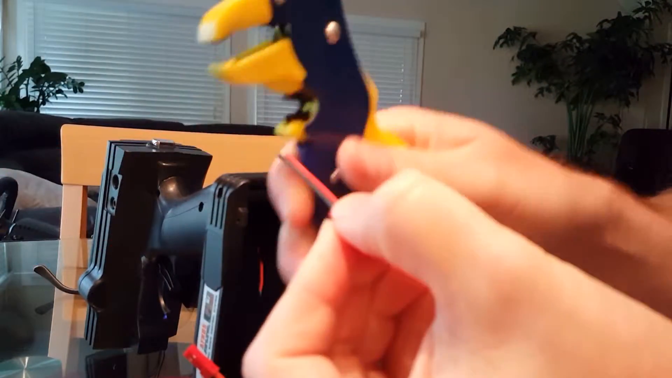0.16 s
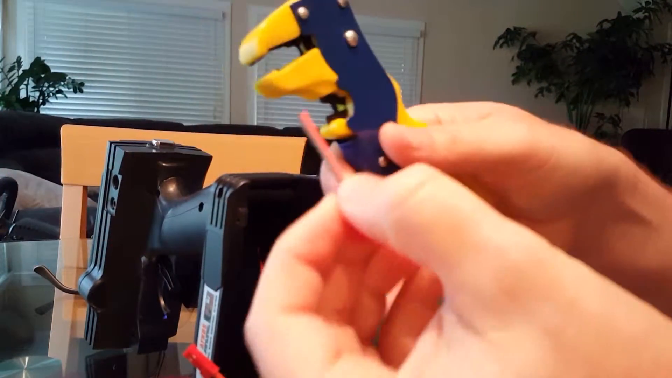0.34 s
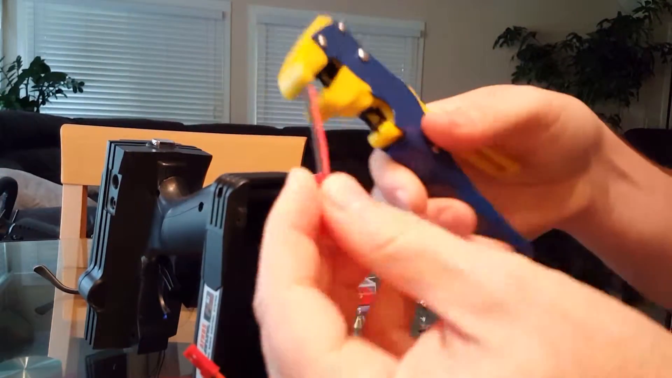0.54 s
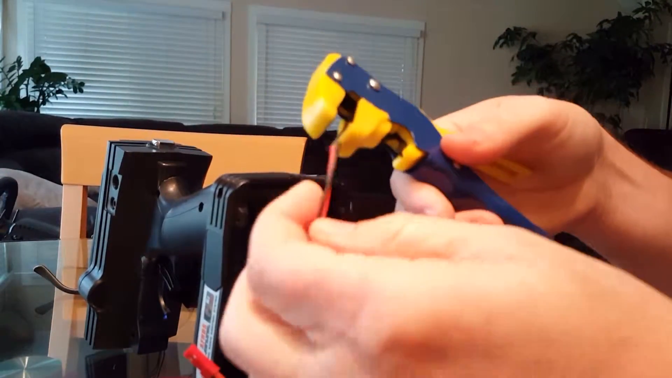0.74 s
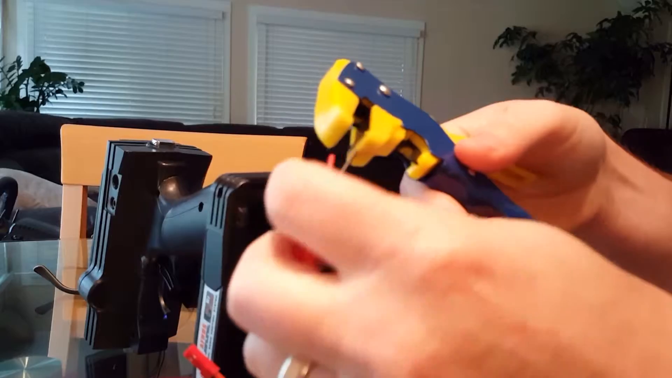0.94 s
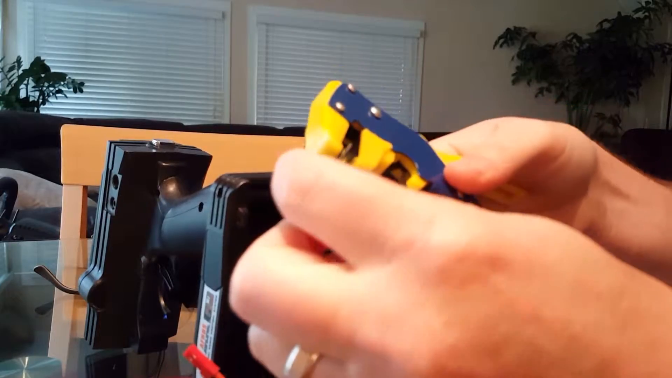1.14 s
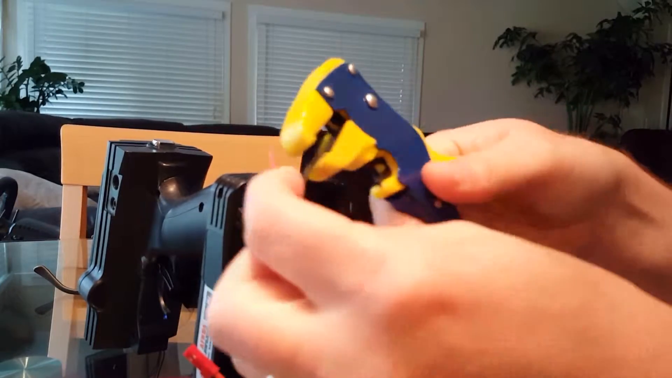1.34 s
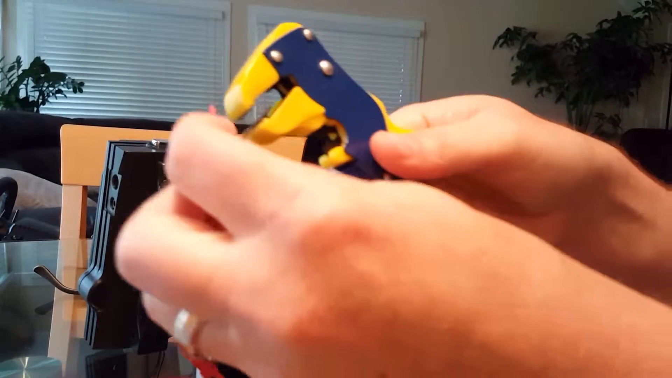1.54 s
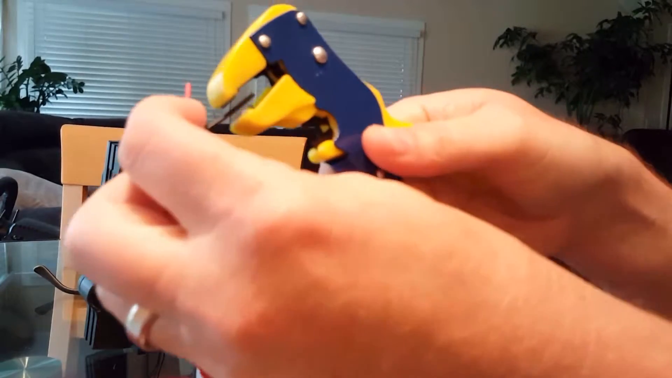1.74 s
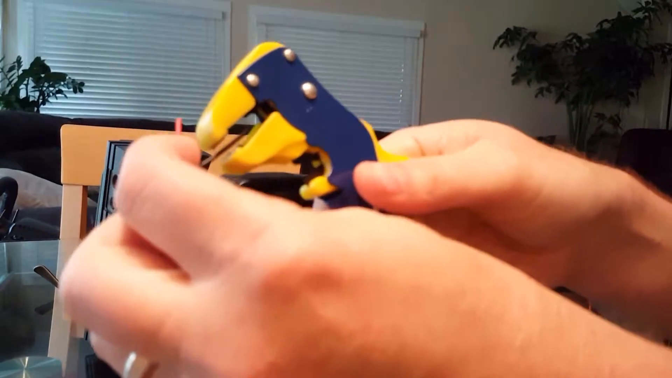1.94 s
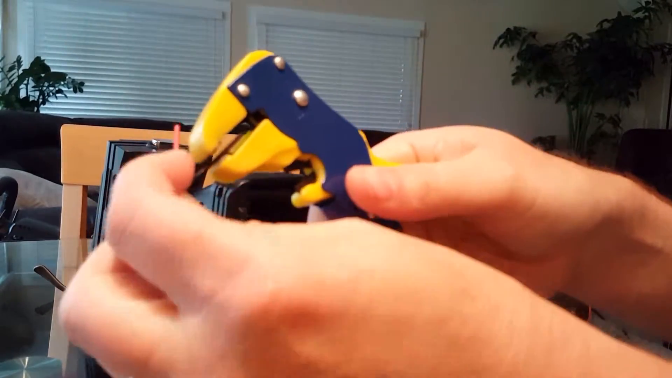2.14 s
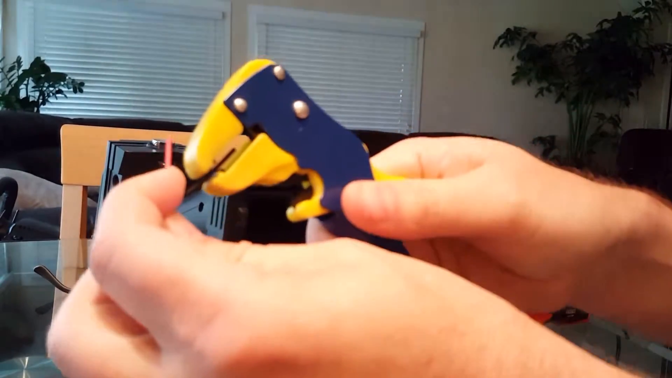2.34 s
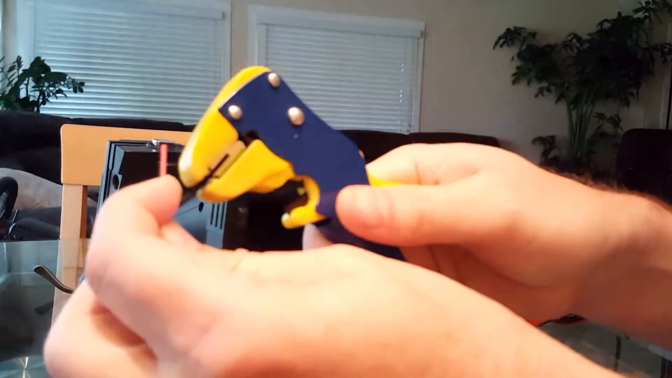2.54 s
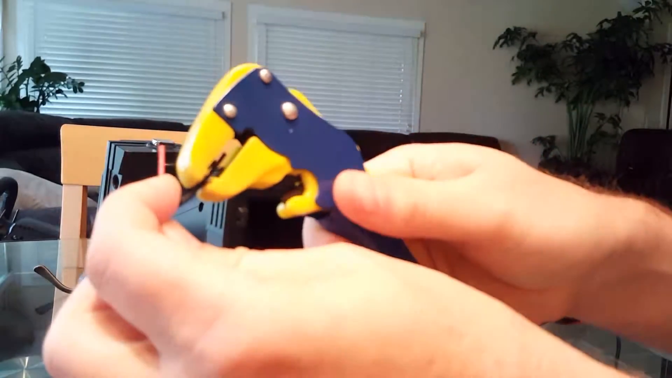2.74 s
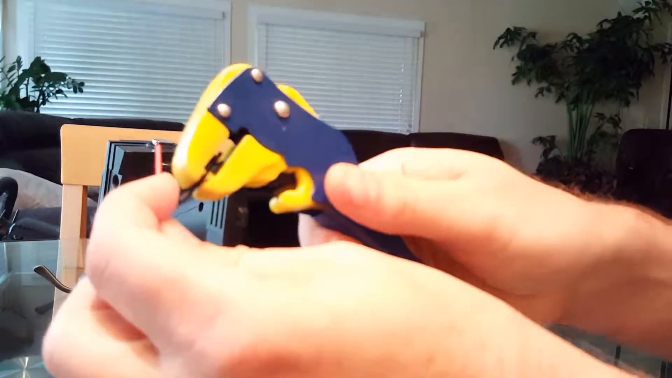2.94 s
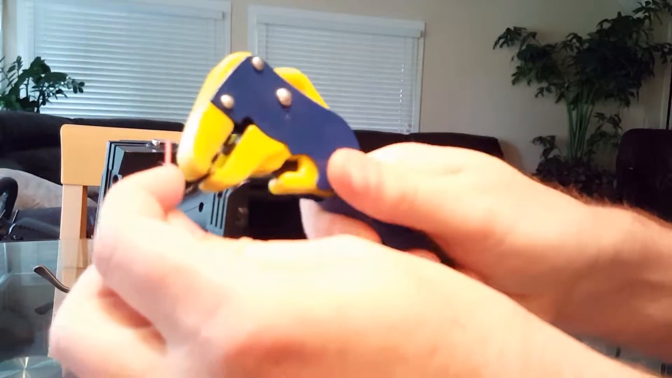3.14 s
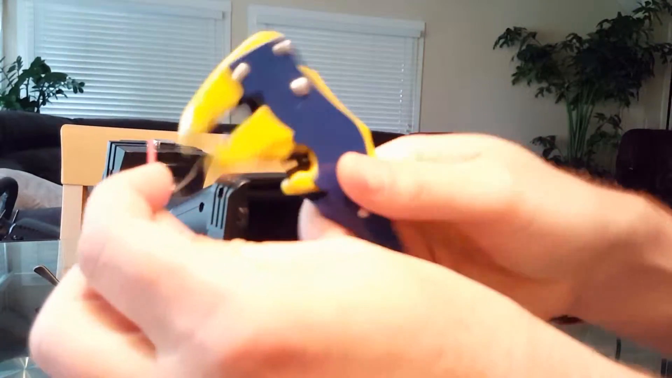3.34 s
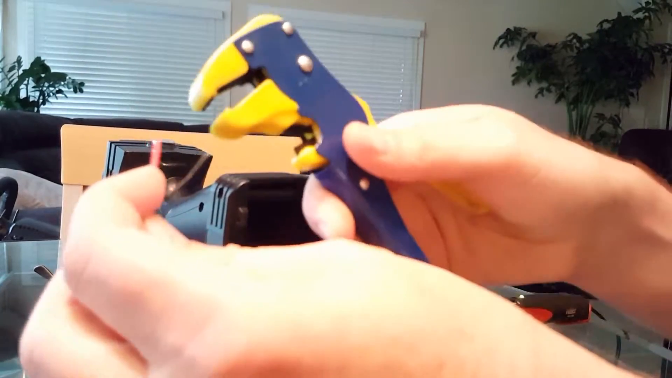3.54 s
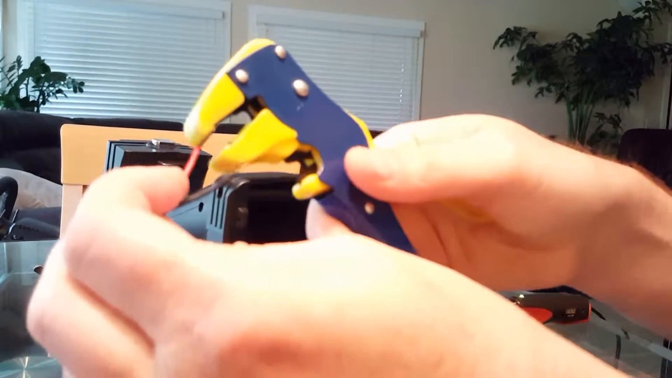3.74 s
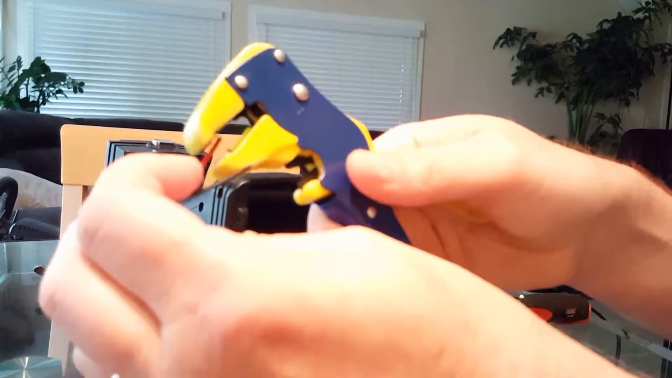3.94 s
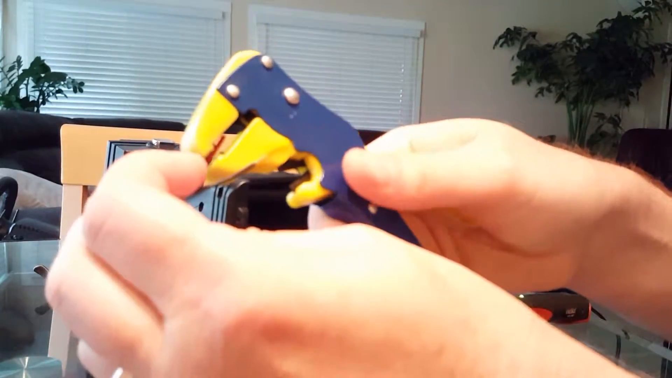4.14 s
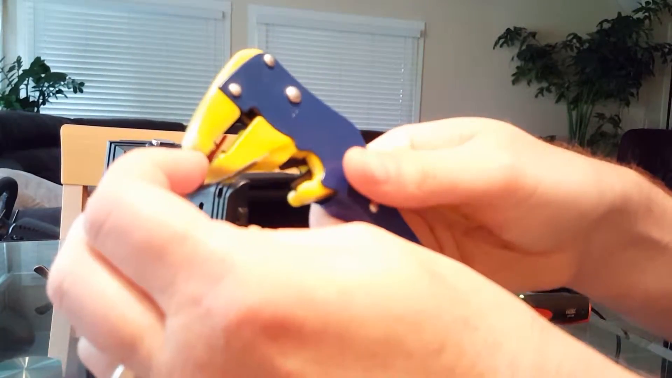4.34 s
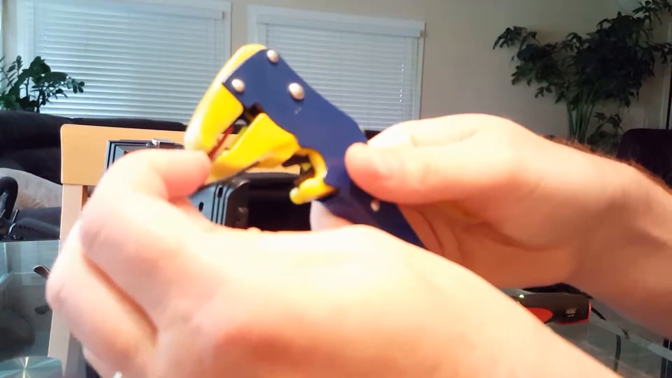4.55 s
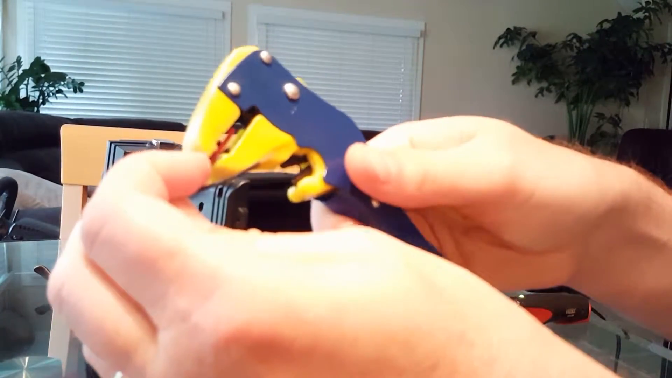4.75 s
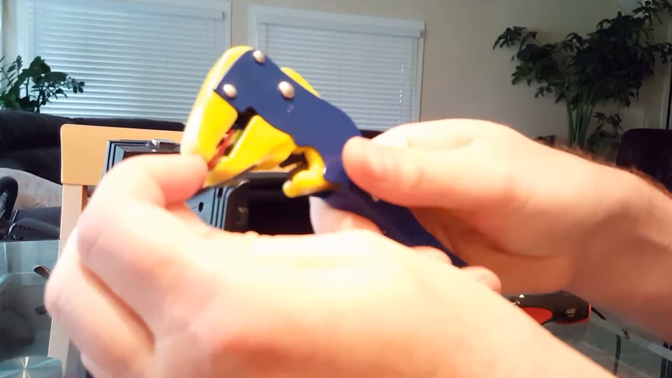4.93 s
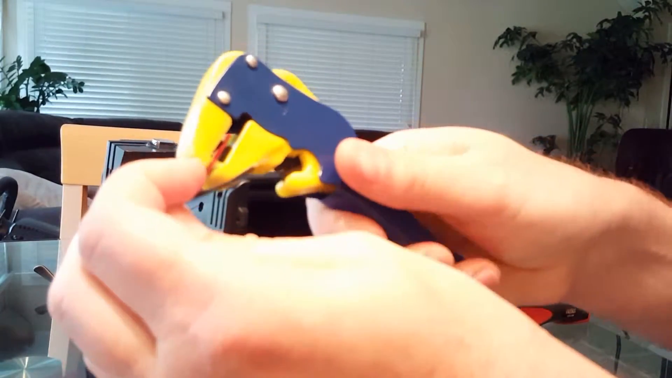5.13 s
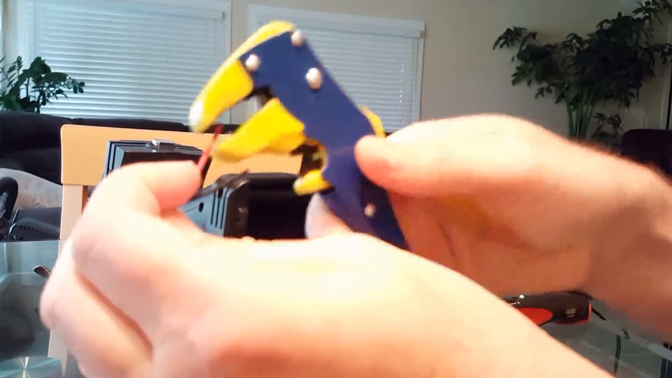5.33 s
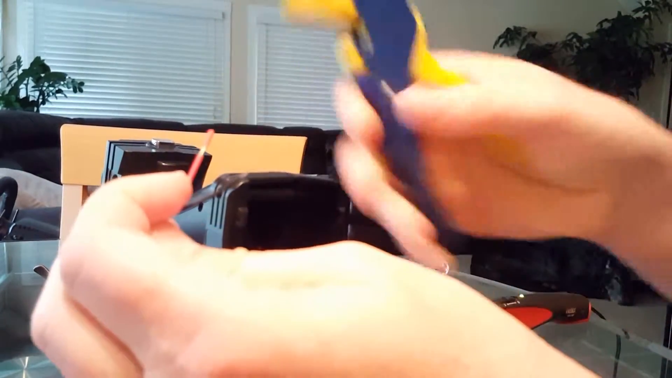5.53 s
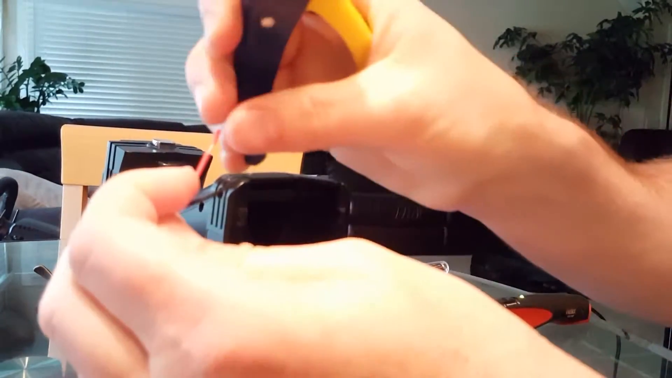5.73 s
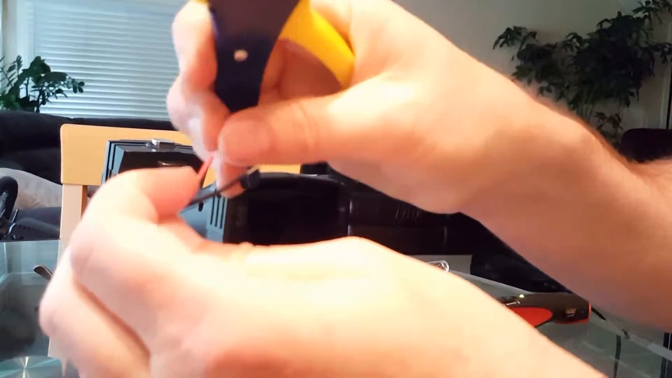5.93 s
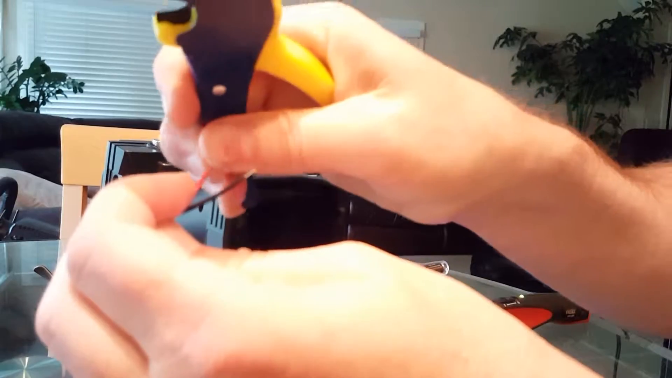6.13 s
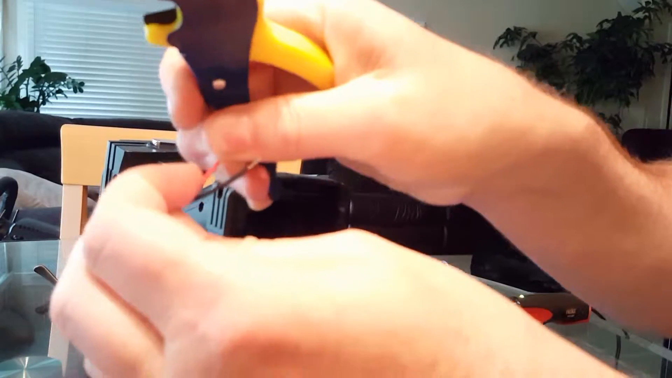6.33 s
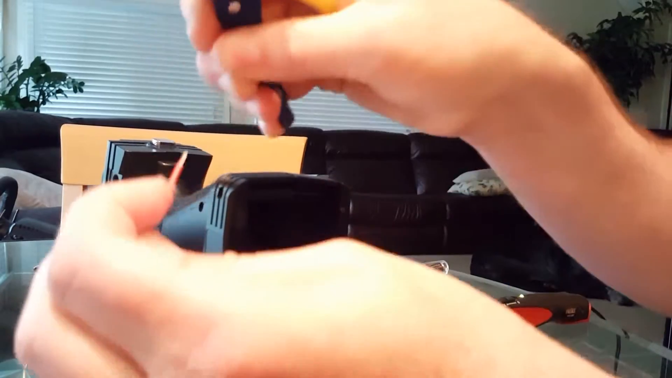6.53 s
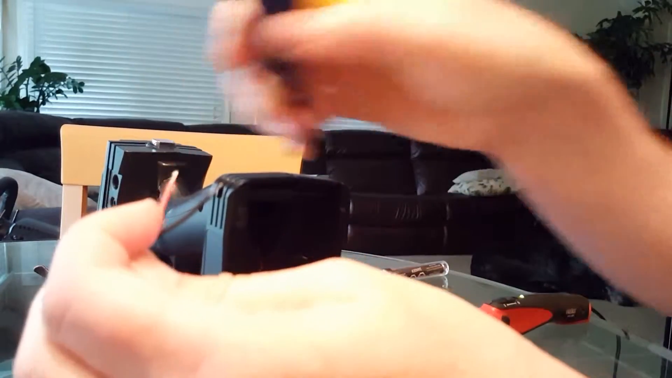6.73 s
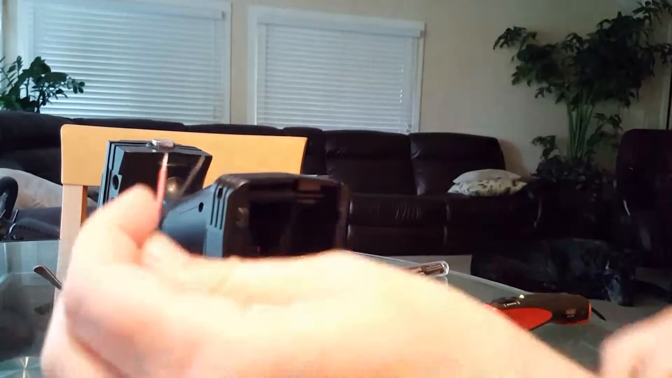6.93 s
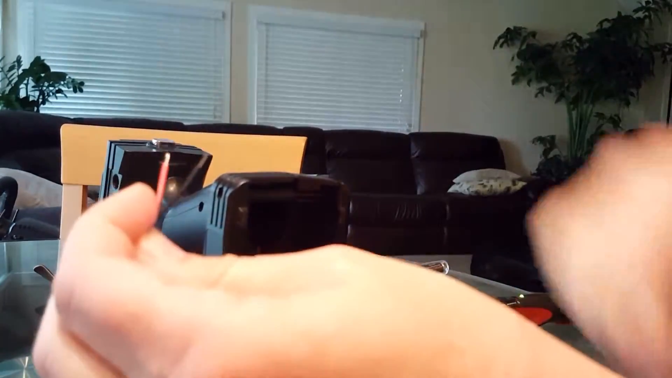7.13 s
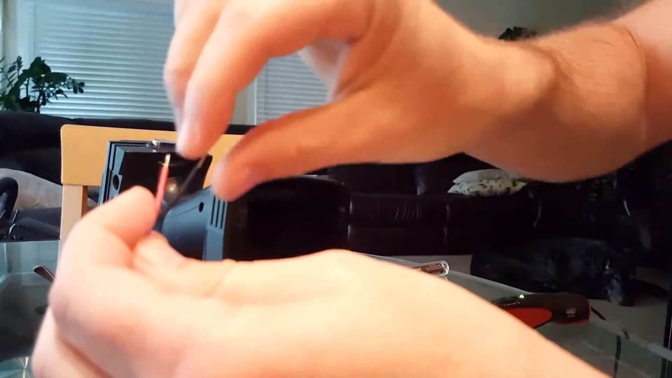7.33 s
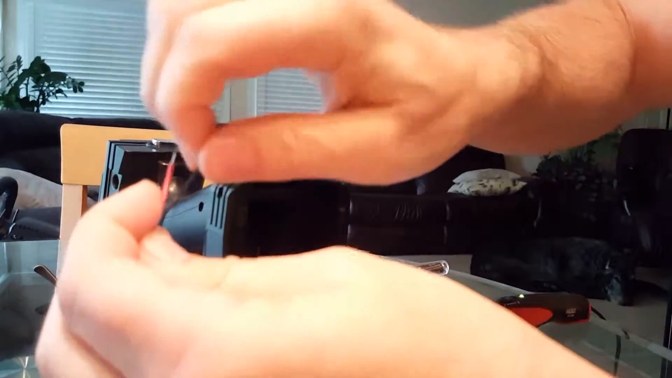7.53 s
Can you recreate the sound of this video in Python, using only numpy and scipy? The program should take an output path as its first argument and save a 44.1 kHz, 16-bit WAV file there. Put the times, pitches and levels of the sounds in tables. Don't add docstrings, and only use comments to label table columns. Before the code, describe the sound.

Wire stripper jaws spring open, snap shut and release twice with sharp metallic cracks, then the tool clatters onto a glass table and rocks still.

```python
import sys
import numpy as np
from scipy import signal
from scipy.fft import rfft, irfft
from scipy.io import wavfile
from scipy.ndimage import uniform_filter1d

SR = 44100
rng = np.random.default_rng(int(sys.argv[2]) if len(sys.argv) > 2 else 0)


def waveform_to_disk(signal):
    frames = np.transpose(np.atleast_2d(signal))
    scaled = np.clip(frames, -1, 1) * 32767
    samples = np.round(scaled).astype(np.int16)
    wavfile.write(sys.argv[1], SR, samples)


def ratio_of_db(decibels):
    return 10 ** (np.asarray(decibels, float) / 20)


N = 334278

# (frequency [Hz], level per Hz [dB])
AIR_SPECTRUM = [(12, -34.5), (20, -8.5), (27, -19), (79, -11), (96, -11.5), (224, -6.5), (265, -4),
                (428, -11.5), (521, -7.5), (566, -10), (888, -13.5), (1740, -21), (4160, -27),
                (14300, -36.5), (16500, -45)]
# (frequency [Hz], width [Hz], level [dB])
DUCT_PEAKS = [(271, 23, 5), (394, 69, 4.5), (504, 25, 5)]
# (time [s], level [units of 3 dB], half width [s])
AIR_SWELLS = [(.25, 0.5, .13), (5.9, 0.5, .3), (7.2, 1, .15), (7.5, 0.55, .2)]
# (frequency [Hz], correlation [-1 to 1])
MIC_LIKENESS = [(60, 0.00091), (150, 0.88), (380, 0.9), (950, 0.46), (2380, -0.19), (5980, 0.061),
                (15000, -0.38)]
# (frequency [Hz], level [dB])
MOTOR = (107, -77)

# (start [s], length [s], level [dB], level change over the stroke [dB])
RUB_STROKES = [(0.034, 0.16, -80.5, 18.5), (0.276, 0.14, -61, -22), (0.408, 0.12, -83, -8),
               (0.516, 0.076, -85.5, -5), (1.419, 0.18, -81.5, -18), (6.732, 0.19, -89, 2.5)]
# (frequency [Hz], level per Hz [dB])
RUB_COLOUR = [(300, -27.5), (1000, -7.5), (1500, -9.5), (1760, -8.5), (4800, -4), (5420, -17), (15100, -16),
              (16500, -41)]

# (time [s], peak level [dB], left-right difference [dB], contact length [ms], ring level [dB])
GRIP_HITS = [
    (.042, -63, 0.5, 1.4, -13.5),
    (.049, -49, 13.5, 1.3, -25),
    (.0593, -26, -1.5, 2.2, -21),
    (.097, -46, 1.5, 2, -3.5),
    (.108, -51, -22.5, 2.3, -16),
    (.1258, -17.5, -0.5, 1.77, -14.5),
    (.193, -34, -5.5, 1.2, -17.5),
]
RELEASE_HITS = [
    (.2192, -12.5, -2.3, 0.84, -26),
    (3.4290, -11, -0.5, 0.66, -30),
    (5.4028, -9.5, -1.1, 0.45, -30.5),
]
SETTLING_HITS = [(.240, -43, -4, 1.5, -22), (.291, -47, 3, 1.3, -14), (.3192, -34, -2, 0.5, -14),
                 (.345, -52, 3, 1.2, -12), (.3805, -42, -1.2, 0.6, -16), (.404, -53, -3, 1.5, -12)]
TAP_HITS = [
    (1.4692, -62, 2, 2, -30),
    (6.4955, -50.5, 1, 1.58, -30),
    (.412, -61, 0, 2, -31),
]
LATCH_HITS = [
    (3.4097, -33.5, -3, 0.65, -32.5),
    (3.412, -45, -6.5, 0.87, -28.5),
    (5.388, -45, -18.5, .7, -41.5),
    (5.3895, -35, 5, 1, -35.5),
]
CLAMP_HITS = [
    (3.1734, -11.5, -3, 0.8, -19),
    (5.2712, -8.5, -3.5, 0.64, -23.5),
]
REBOUND_HITS = [
    (3.1803, -30, -2, 1, -6),
    (5.2782, -26, -3, 1, -5),
]
FIRST_BOUNCE_HITS = [
    (6.9950, -9, 0, 1.56, -14.5),
    (6.9995, -20.5, -13, 0.85, -27),
    (7.0042, -14.5, -1.5, 2.5, -26.5),
    (7.011, -30, -9.5, 2.5, -19),
    (7.0245, -31.5, -2.5, 6.5, -3.5),
]
SECOND_BOUNCE_HITS = [(7.1578, -19, 0.5, 6.4, -27.5), (7.1633, -10, -2.5, 3.7, -9.5),
                      (7.167, -9, -3.5, 3, -29), (7.172, -17, -3, 1.6, -23), (7.1765, -15, 4, 2.7, -28),
                      (7.180, -14, -3, 1.4, -21.5), (7.1885, -22, -8, 1.5, -28),
                      (7.199, -19.5, 4, 0.87, -21)]
# (time [s], peak level [dB], left-right difference [dB], steel ring level [dB])
TICK_HITS = [(1.4294, -51.5, -7, -18), (1.440, -71, -4, -22), (3.319, -54.5, -2.5, -26),
             (3.78, -62, -2, -22), (4.5496, -53.5, 1, -21), (6.5046, -63, -2.2, -28),
             (6.760, -54.5, -5, -15), (6.782, -51.5, -2, -6), (6.8286, -58, -0.5, -12.5),
             (6.857, -62.5, -1, -10)]
# (time [s], peak level [dB])
ROCK_HITS = [(7.341, -43.5), (7.3959, -48), (7.435, -52.5), (7.4593, -57), (7.481, -56), (7.4915, -61),
             (7.503, -63), (7.5223, -59)]
# (end time [s], level [dB], frequency [Hz], build-up [ms])
SPRING_SLIPS = [
    (0.190, -45, 1370, 4.5),
    (3.408, -45, 1340, 1.6),
    (5.387, -45, 1348, 2.6),
]
# (time [s], level [dB], frequency [Hz], decay to -60 dB [s])
BODY_KNOCKS = [(3.18, -58.5, 63, 0.27), (3.435, -63.5, 74.5, 0.17), (5.28, -55, 83, 0.23),
               (5.411, -51, 110, 0.095), (7.9, -65, 67, .2), (6.998, -58.5, 680, 0.14),
               (12, -46, 450, 0.12), (7.166, -34.5, 270, 0.057), (6.996, -50, 550, 0.056)]

# (frequency [Hz], level per Hz [dB])
GRIP_COLOUR = [(180, -51), (300, -30), (1210, -18.5), (2000, -9.5), (2700, -22.5), (3360, -5.5),
               (4930, -11), (10300, -6.5), (12600, -16), (15200, -14), (16500, -30.5)]
RELEASE_NEAR = [(180, -52.5), (300, -25.5), (2610, -27), (4100, -6), (5640, -0.5), (6560, -11), (8300, -4),
                (10500, -16.5), (12400, -14), (15200, -17), (16500, -28)]
RELEASE_FAR = [(880, -54), (1500, -18.5), (2170, -33.5), (3400, -8.5), (4800, -8.5), (5750, -0.5),
               (6700, -9), (8300, -8.5), (13500, -16), (15200, -12), (16000, -13), (16500, -45)]
TICK_COLOUR = [(180, -36), (300, -5.5), (2360, -6.5), (3030, -4), (8300, -8), (9180, -12), (9980, -7.5),
               (11600, -16.5), (16500, -17)]
TAP_COLOUR = [(500, -37), (1600, 0), (2100, -6), (2600, -9), (4400, -5), (5600, -11), (7200, -16),
              (12000, -22)]
CLAMP_NEAR = [(88, -47.5), (150, -17), (518, -2), (2810, -11), (3500, -4.5), (4330, 1.5), (5380, -11),
              (6940, -3), (10100, -12.5), (10900, -2.5), (13600, -16), (14700, -13.5), (15600, -14.5),
              (16500, -25.5)]
CLAMP_FAR = [(470, -46), (800, -13.5), (1000, -9), (2070, -15), (3600, 5), (4300, -3), (5080, -8),
             (6140, 2.5), (8120, -12), (8980, -8), (15100, -8.5), (16500, -23.5)]
TIGHT_NEAR = [(88, -63), (150, -12), (508, -14), (972, -30), (1930, -15), (2760, -24.5), (3600, -5),
              (4250, 3), (5170, -13.5), (6940, -4.5), (8130, -15.5), (8790, -12.5), (15600, -16),
              (16500, -24.5)]
TIGHT_FAR = [(470, -52.5), (800, -26), (943, -17), (2200, -22), (3750, 3.5), (4950, -14), (6220, -5.5),
             (7920, -17), (15100, -15), (15900, -22), (16500, -37.5)]
FIRST_BOUNCE_COLOUR = [(88, -24.5), (150, -11), (916, -7.5), (1050, -0.5), (1440, -12), (1720, -1),
                       (2450, -10), (4780, -3), (6940, -14), (10100, -7), (16500, -29.5)]
SECOND_BOUNCE_COLOUR = [(88, -42.5), (150, -26), (1140, -20.5), (1250, -7.5), (1380, -23), (1750, -7),
                        (2310, -17), (2870, -8.5), (3350, -16.5), (13600, -28.5), (16500, -44)]
ROCK_COLOUR = [(590, -48), (1000, -16), (1780, -5), (2910, -22), (3130, -54), (3620, -20), (4120, -29),
               (9000, -30), (11700, -65), (19800, -120)]

# (frequency [Hz], level [dB], decay to -60 dB [s])
GRIP_MODES = [(420, -6, .015), (1350, -8, .02), (2000, 2, .025), (2600, -12, .05), (3370, 4, .03),
              (4750, -4, .07), (7100, -10, .05)]
SPRING_MODES = [(3700, -9, .04), (5480, -5, .1), (5650, -3, .14), (5790, 0, .2), (5960, -2, .17),
                (6150, -7, .1)]
JAW_MODES = [(1364, -5, .15), (1780, -11.5, 0.067), (2584, -3, .1), (3680, 2, 0.044), (4630, -1, 0.11),
             (4750, -1, 0.092), (5600, -5, 0.16), (7100, -5.5, .06)]
CASE_MODES = [(560, -1, .012), (1130, -1, .018), (1720, -2, .013), (2450, -3, .016), (3520, 4, .03),
              (3900, 4, .016), (4250, 5, .016), (4600, 1, .012), (8650, -3, .012)]
TIGHT_CASE_MODES = [(453, 1.5, 0.013), (1220, -2.5, .016), (1970, -3, .01), (2634, -13, 0.014),
                    (3640, -7, .03)]
STEEL_MODES = [(2600, -8, .08), (3680, -7, .06), (4200, -9, .05), (4700, 0, .1), (4790, -6, .08),
               (7050, -8, .06), (8400, -13, .06)]
BLADE_MODES = [(3750, 0, .018), (6400, -7, .018)]
TABLE_END_MODES = [(250, -12, .08), (400, -6, .09), (590, -7, .11), (781, -8, .16), (911, -11, .12),
                   (1077, -11, .1), (1254, -5, .28), (1707, 0, .13), (1798, -2, .13), (2256, -9, .13),
                   (2584, -7, .11), (3128, -8, .11), (3540, -11, .14), (3946, -8, .11), (4660, -4, .11),
                   (4753, -4, .14), (4947, -3, .07), (5803, -14, .16), (8398, -6, .06)]
TABLE_MODES = [(585, -9, .14), (777, -1, .12), (912, -4, .12), (1077, -9, .09), (1251, -1, .23),
               (1513, -6, .14), (1705, -3, .11), (1783, 5, .1), (1803, -7, .17), (2107, -5, .15),
               (2202, -8, .14), (2592, -7, .14), (2775, -8, .23), (2856, -3, .09), (3135, -5, .15),
               (3548, -5, .16), (3585, -8, .16), (4676, -5, .17), (5100, -14, .13), (5650, -15, .18),
               (7038, -7, .07), (8400, -11, .1)]
HEEL_MODES = [(1726, -5, 0.09), (1792, 1.5, 0.11), (2030, -10, 0.045), (2240, -17, .04), (3560, -17, 0.058)]

# (frequency [Hz], decay to -60 dB [s])
ROOM_DECAY = [(100, 0.22), (500, .22), (2000, 0.18), (4000, .18), (5800, 0.22), (8000, 0.17), (12000, .16),
              (15700, 0.18), (16200, .04)]
# (delay [s], level [dB])
ROOM_ECHOES = [(.0035, -22.5), (.0072, -9), (0.0104, -30), (0.018, -22.5), (.038, -27)]

HAND_LAG_MS, TABLE_LAG_MS = .03, .16


def add(mix, s, sound):
    part = mix[..., round(s * SR):][..., :sound.shape[-1]]
    part += sound[..., :part.shape[-1]]


def evened(x):
    return x / np.sqrt(np.mean(x ** 2) + 1e-20)


def whitened(x):
    z = rfft(x, axis=-1)
    return irfft(z / (abs(z) + 1e-12), x.shape[-1], axis=-1)


def read(points, hz):
    f, value = np.transpose(points)
    return np.interp(np.log(hz + 1), np.log(f + 1), value)


def colour(points):
    level_db = np.maximum(read(points, np.fft.rfftfreq(2048, 1 / SR)), -100)
    half = np.log(ratio_of_db(level_db))
    full = np.r_[half, half[-2:0:-1]]
    spectrum = np.exp(full - 1j * signal.hilbert(full).imag)
    taps = np.fft.ifft(spectrum).real[None, :1024]
    return taps / np.linalg.norm(taps)


def paired(x):
    z = rfft(x, axis=1)
    same = np.clip(read(MIC_LIKENESS, np.fft.rfftfreq(x.shape[1], 1 / SR)), -1, 1)
    return irfft([z[0], same * z[0] + np.sqrt(1 - same ** 2) * z[1]], x.shape[1], axis=1)


def ring(modes):
    t = np.arange(SR // 4) / SR
    total = np.zeros(len(t))
    for hz, db, t60 in modes:
        phase = np.arctan(np.log(1000) / t60 / (2 * np.pi * hz))
        total += ratio_of_db(db - 60 * t / t60) * np.cos(2 * np.pi * hz * t + phase)
    return ((1 - np.exp(-t / 0.00039)) * total)[None]


def blows(rows, near, far, modes, far_db, rise_ms, alike, lag_ms=HAND_LAG_MS, crack=0):
    out = np.zeros((2, 2, N))
    t_ms = np.arange(1024) / SR * 1000
    near, far, body = colour(near), colour(far), ring(modes)[0]
    lag = round(lag_ms * SR / 1000)
    late = np.zeros(lag // 2)
    for s, db, pan_db, ms, ring_db in rows:
        shape = (1 - np.exp(-(t_ms / rise_ms) ** 2)) * np.exp(-t_ms / ms)
        touching = shape > 1e-3
        push = rng.standard_normal((2, len(t_ms)))
        for _ in range(4):
            steady = push / (uniform_filter1d(abs(push), size=9) + 1e-9)
            push = whitened(steady * shape) * touching
        right, other = paired(push) * touching
        left = np.roll(alike * right + np.sqrt(1 - alike ** 2) * other, lag)
        push = np.array([left, right])
        push[[0, 1], shape.argmax() + np.array([lag, 0])] += crack
        push /= np.sqrt(1 + crack ** 2)
        level = ratio_of_db(db + np.array([[pan_db], [-pan_db]]) / 2) / 2
        rung = np.array([np.r_[late, body], np.r_[body, late]]) * level * ratio_of_db(ring_db)
        push *= level * np.linalg.norm(shape) / shape.max()
        add(out, s, np.array([rung, 0.25 * rung]))
        add(out[0], s, signal.fftconvolve(push, near, axes=1))
        add(out[1], s, signal.fftconvolve(push, far, axes=1) * ratio_of_db(far_db))
    return out


def ventilation():
    frames, hz = N // 1024 + 5, np.fft.rfftfreq(4096, 1 / SR)
    a, b = rng.standard_normal((2, 2, len(hz), frames))
    patches = uniform_filter1d(rng.standard_normal((len(hz), frames)), size=24, axis=0)
    patches = evened(uniform_filter1d(patches, size=3, axis=1))
    level_db = read(AIR_SPECTRUM, hz)
    for f, width, db in DUCT_PEAKS:
        level_db = level_db + db / (1 + (2 * (hz - f) / width) ** 2)
    t = (np.arange(frames) - 2) * 1024 / SR
    swell_db = sum(db * np.exp(-((t - s) / half) ** 2) for s, db, half in AIR_SWELLS)
    bass = 1 / (1 + (hz[:, None] / 1500) ** 2)
    level_db = level_db[:, None] + 0.42 * patches + 3.0 * swell_db * bass
    same = np.clip(read(MIC_LIKENESS, hz), -1, 1)[:, None]
    left, other = a + 1j * b
    z = np.array([left, same * left + np.sqrt(1 - same ** 2) * other]) * ratio_of_db(level_db)
    out = signal.istft(z, nperseg=4096, noverlap=3072)[1][:, :N]
    return ratio_of_db(-64.5 + np.array([[.8], [1.2]])) * evened(out)


def motor_hum():
    hz, db = MOTOR
    waver = evened(uniform_filter1d(rng.standard_normal(N), size=9000))
    pitch = hz + 4.1 * np.roll(waver, N // 2)
    return ratio_of_db(db + 1.4 * waver) * np.sin(2 * np.pi * np.cumsum(pitch) / SR)


def rubbing():
    out = np.zeros((2, N))
    t = np.arange(SR // 3) / SR
    damped_jaws = ring([(hz, db, t60 * .45) for hz, db, t60 in JAW_MODES])[0]
    for s, length, db, ease_db in RUB_STROKES:
        unevenness = evened(uniform_filter1d(rng.standard_normal(len(t)), size=90))
        micro_slips = rng.standard_normal((2, len(t))) * ratio_of_db(1.7 * unevenness)
        grain = evened(signal.fftconvolve(micro_slips, colour(RUB_COLOUR), axes=1)[:, :len(t)])
        struck = rng.random(len(t)) < 110 / SR
        knocks = ratio_of_db(4.0 * rng.exponential(1, len(t))) * struck * np.sign(micro_slips[0])
        grain += ratio_of_db(-6.0) * evened(signal.fftconvolve(knocks, damped_jaws)[:len(t)])
        stroke = np.clip(np.minimum(t, length - t) / 0.017, 0, 1)
        add(out, s, grain * stroke * ratio_of_db(db + 8.0 + ease_db * (t / length) ** 1.2))
    return out


def handling():
    return blows(GRIP_HITS, GRIP_COLOUR, GRIP_COLOUR, GRIP_MODES, far_db=-8.0, rise_ms=0.43, alike=0.6)


def room(x):
    taps = rng.standard_normal((2, SR // 2)) * (rng.random((2, SR // 2)) < .15)
    hz, t, z = signal.stft(taps, SR, nperseg=256)
    decay = ratio_of_db(-60 * t / read(ROOM_DECAY, hz)[:, None])
    tail = signal.istft(z * decay, SR, nperseg=256)[1]
    tail *= np.clip(np.arange(tail.shape[1]) / SR / 0.0019, 0, 1) ** 2
    tail = paired(tail / np.linalg.norm(tail[0])) * ratio_of_db(-3.0)
    for s, db in ROOM_ECHOES:
        for side, shift in zip(tail, rng.integers(-9, 9, 2)):
            add(side, s + shift / SR, ratio_of_db(db) * np.hanning(6) / 1.5)
    return signal.oaconvolve(x, tail, axes=1)[:, :N]


def spring_squeaks():
    out, t = np.zeros(N), np.arange(-1300, 900) / SR
    for s, db, hz, ms in SPRING_SLIPS:
        swell = np.where(t < 0, np.exp(t * 1000 / ms), np.exp(-t / 0.0017))
        add(out, s - 1300 / SR, ratio_of_db(db) * swell * np.sin(2 * np.pi * hz * t))
    return out


def releases():
    return blows(RELEASE_HITS, RELEASE_NEAR, RELEASE_FAR, SPRING_MODES, far_db=-7.5, rise_ms=0.8, alike=0.89, crack=0.2)


def settling():
    return blows(SETTLING_HITS, TICK_COLOUR, GRIP_COLOUR, JAW_MODES, far_db=-0.5, rise_ms=0.35, alike=0.58)


def finger_taps():
    return blows(TAP_HITS, TAP_COLOUR, TAP_COLOUR, CASE_MODES, far_db=-6.0, rise_ms=0.4, alike=0.6)


def ticks_and_latch():
    ticks = [(s, db, pan_db, 1.1, ring_db) for s, db, pan_db, ring_db in TICK_HITS]
    return blows(ticks + LATCH_HITS, TICK_COLOUR, TICK_COLOUR, STEEL_MODES, far_db=-5.0, rise_ms=0.32, alike=0.2)


def clamps():
    first = blows(CLAMP_HITS[:1], CLAMP_NEAR, CLAMP_FAR, CASE_MODES,
                  far_db=-8.0, rise_ms=.12, alike=.3, crack=.7)
    second = blows(CLAMP_HITS[1:], TIGHT_NEAR, TIGHT_FAR, TIGHT_CASE_MODES,
                   far_db=-8.5, rise_ms=0.1, alike=0.32, crack=.7)
    return first + second


def knocks():
    out, t = np.zeros(N), np.arange(SR // 3) / SR
    for s, db, hz, t60 in BODY_KNOCKS:
        add(out, s, ratio_of_db(db - 60 * t / t60) * (1 - np.exp(-t / .004)) * np.sin(2 * np.pi * hz * t))
    return out


def rebounds():
    return blows(REBOUND_HITS, TIGHT_FAR, TIGHT_FAR, BLADE_MODES, far_db=-8.0, rise_ms=0.4, alike=.5)


def table_bounces():
    first = blows(FIRST_BOUNCE_HITS, FIRST_BOUNCE_COLOUR, FIRST_BOUNCE_COLOUR, TABLE_END_MODES,
                  far_db=-3.0, rise_ms=0.36, lag_ms=TABLE_LAG_MS, alike=0.32)
    second = blows(SECOND_BOUNCE_HITS, SECOND_BOUNCE_COLOUR, SECOND_BOUNCE_COLOUR, TABLE_MODES,
                   far_db=-2.0, rise_ms=0.56, lag_ms=TABLE_LAG_MS, alike=0.81)
    return first + second


def rocking():
    rocks = [(s, db, -1.5, 0.425, -0.5) for s, db in ROCK_HITS]
    return blows(rocks, ROCK_COLOUR, ROCK_COLOUR, HEEL_MODES,
                 far_db=7.0, rise_ms=0.15, lag_ms=TABLE_LAG_MS, alike=0.63)


def scene():
    near, far = (handling() + releases() + settling() + finger_taps() + ticks_and_latch()
                 + clamps() + rebounds() + table_bounces() + rocking())
    squeak = spring_squeaks()
    direct = near + squeak
    echo = room(far + 0.5 * squeak)
    return direct + echo + rubbing() + knocks() + ventilation() + motor_hum()


def top_cut(x):
    return signal.sosfilt(signal.butter(12, 17130, fs=SR, output="sos"), x)


def record(dry):
    edge = signal.firwin(255, 16600, window=("kaiser", 9), fs=SR)
    mix = signal.oaconvolve(dry, edge[None], "same", axes=1)
    return top_cut(mix)


dry = scene()
out = record(dry)
waveform_to_disk(out)
```